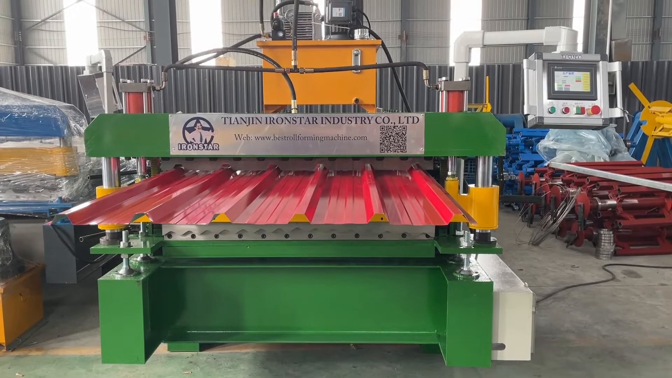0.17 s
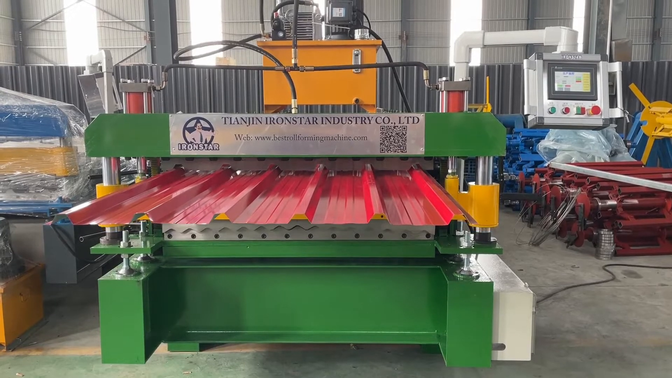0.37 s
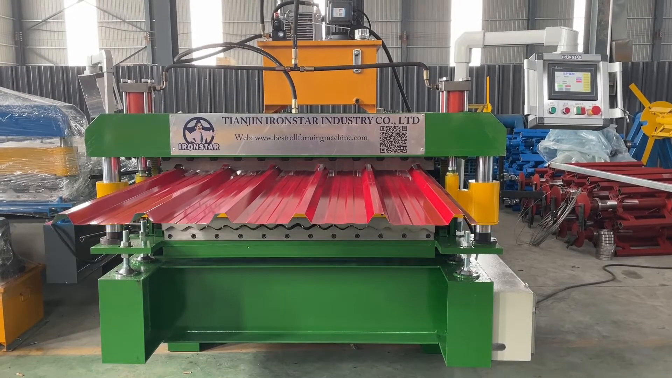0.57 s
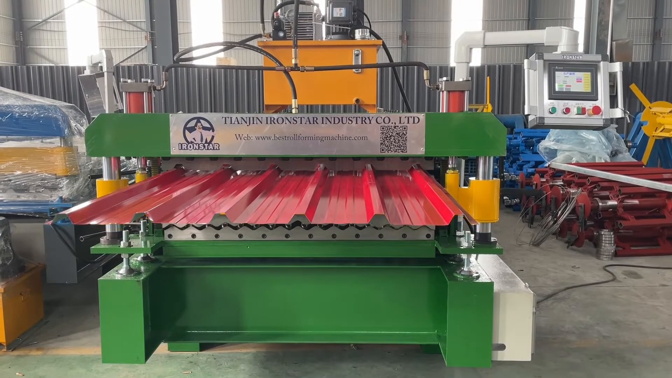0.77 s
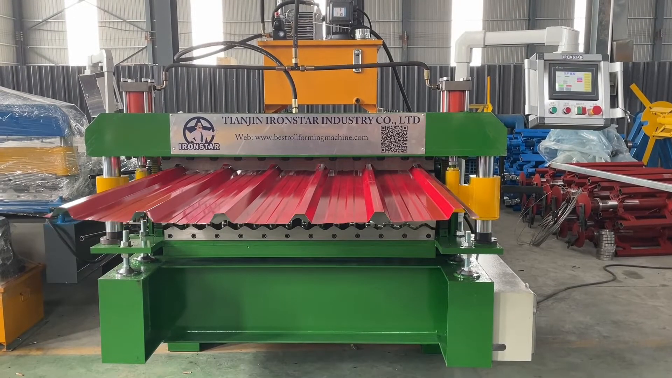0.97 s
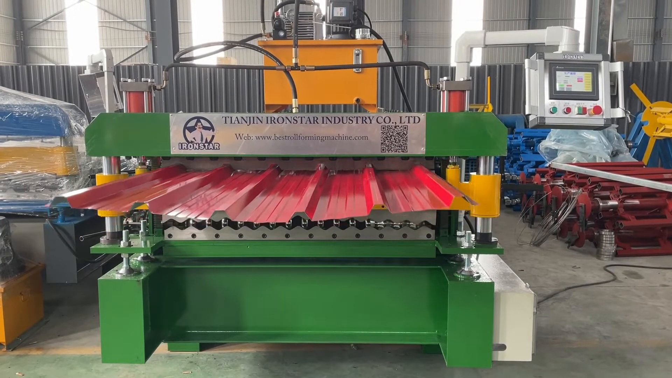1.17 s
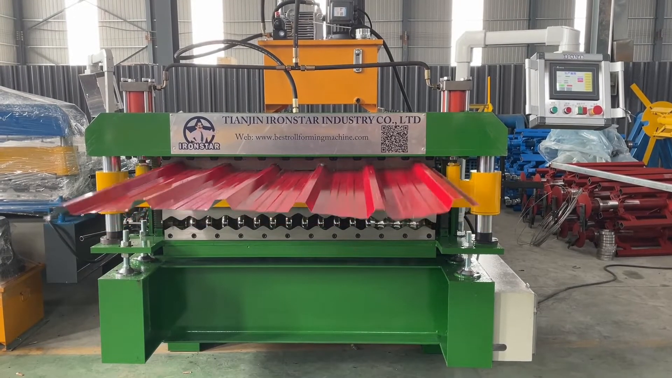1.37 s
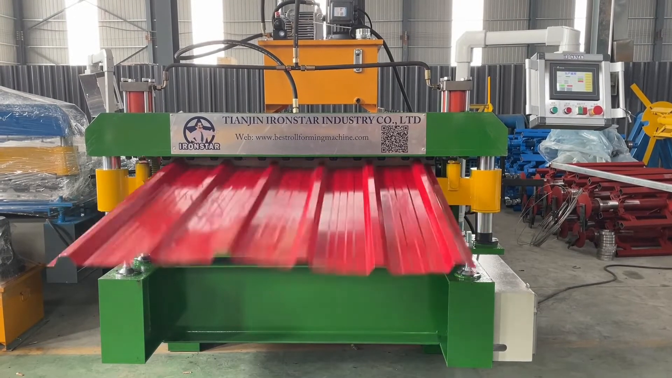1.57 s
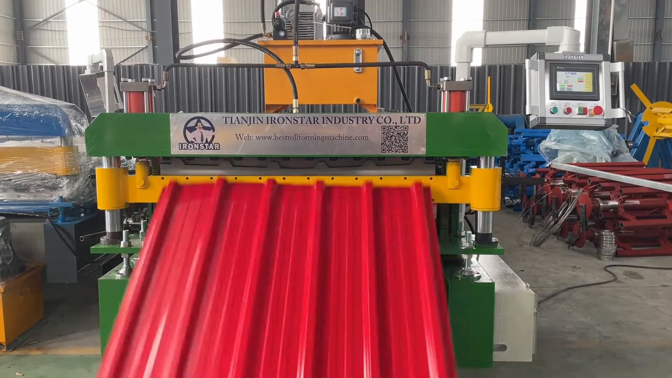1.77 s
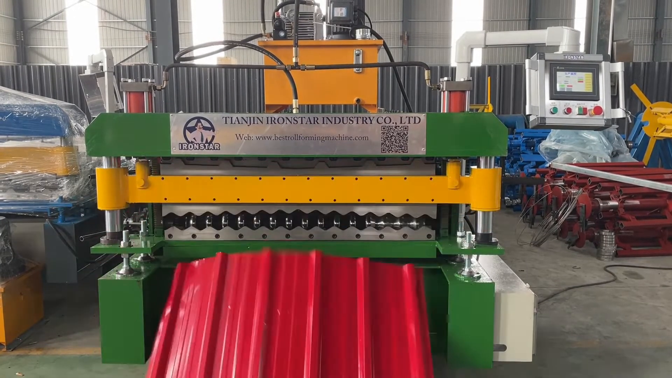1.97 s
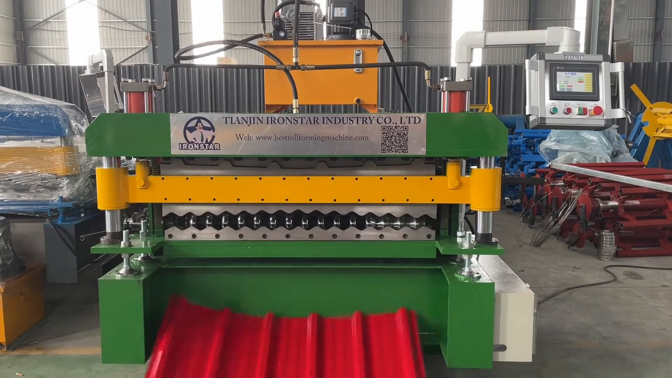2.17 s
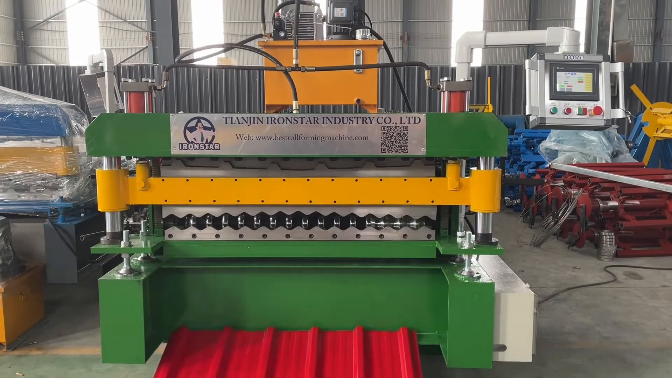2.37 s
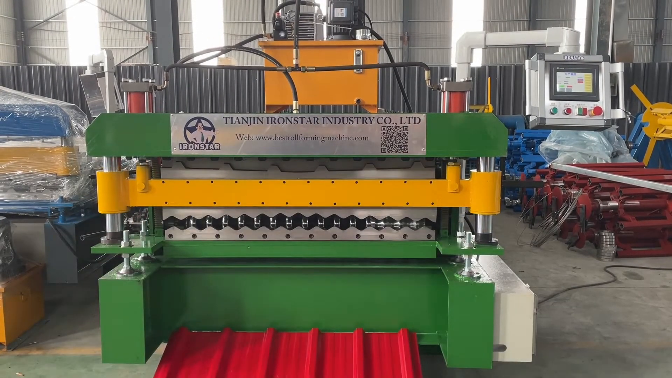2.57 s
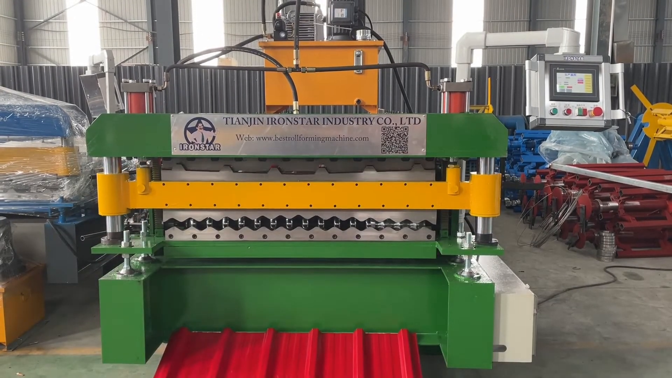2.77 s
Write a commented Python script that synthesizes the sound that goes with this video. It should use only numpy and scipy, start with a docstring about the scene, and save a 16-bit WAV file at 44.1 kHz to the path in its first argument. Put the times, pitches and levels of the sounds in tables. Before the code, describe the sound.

A thin ribbed metal roofing sheet is sheared off, clatters down and rattles on concrete beside a humming machine

```python
"""A roll forming machine hums in a factory hall: shaped noise, faint whines, a low rumble and swelling resonances.
A valve ticks, the tone of the hydraulic pump rises as it takes up load, and the heavy frame thuds.
The shear crunches through a thin ribbed steel panel, which buckles, tips off the die, lands on the concrete
floor and rattles to rest: bursts of clicks ring its modes, and gliding tones sing as the sheet flexes.
The hall rings on after every blow on the panel, as a decaying noise response."""
import sys
import numpy as np
from scipy import signal
from scipy.fft import rfft, irfft
from scipy.io import wavfile
from scipy.ndimage import uniform_filter1d

SR = 44100
rng = np.random.default_rng(int(sys.argv[2]) if len(sys.argv) > 2 else 0)


def digitize_waveform(pressure):
    """Quantize a signal to 16-bit integers and store it at the path in sys.argv[1].

    Rows of a 2-D input are taken as channels; values are limited to [-1, 1].
    """
    field = np.atleast_2d(pressure).T
    bounded = np.clip(field, -1, 1)
    quanta = np.round(bounded * 32767).astype(np.int16)
    wavfile.write(sys.argv[1], SR, quanta)


N = 125685
TIME = np.arange(N) / SR
SIZE = 2 ** 18   # transform length, with room for tails
FREQS = np.maximum(np.arange(SIZE // 2 + 1) * SR / SIZE, 1)


def from_db(db):
    """Decibels to gain."""
    return 10 ** (np.asarray(db) / 20)


def rms_one(x):
    """Scale to unit rms."""
    return x / np.sqrt(np.mean(x ** 2) + 1e-20)


def in_time(rows):
    """Each column of a timed table, drawn as straight lines at every sample."""
    s, *columns = np.transpose(rows)
    return [np.interp(TIME, s, c) for c in columns]


def at_hz(points, hz):
    """Read a table on a log-frequency axis."""
    f, value = np.transpose(points)
    return np.interp(np.log(hz), np.log(f), value)


def drift(rate_hz):
    """Random wander of unit rms, smoothed above the given rate."""
    spectrum = rfft(rng.standard_normal(SIZE))
    return rms_one(irfft(spectrum / (1 + (FREQS / rate_hz) ** 2))[:N])


def coloured(x, db):
    """Minimum-phase filter with the given gain at every frequency, so nothing sounds early."""
    cepstrum = irfft(np.log(from_db(db)))
    cepstrum[1:SIZE // 2] *= 2
    cepstrum[SIZE // 2 + 1:] = 0
    return irfft(rfft(x, SIZE) * np.exp(rfft(cepstrum)))[..., :N]


def octaves(x):
    """Split into overlapping octave bands that add up to the whole: (centre_hz, band)."""
    centres = np.geomspace(50, 12800, num=9)
    spectrum = rfft(x, SIZE)
    for hz, share in zip(centres, np.eye(len(centres))):
        weight = np.interp(np.log(FREQS), np.log(centres), share)
        yield hz, irfft(spectrum * weight)[..., :N]


def bandpassed(x, low_hz, high_hz):
    """Keep one resonant band."""
    return signal.sosfilt(signal.butter(2, [low_hz, high_hz], "band", fs=SR, output="sos"), x)


def stereo_noise(likeness):
    """White noise whose two sides are alike by the given table, mixed from a middle and a side part."""
    mid, side = rfft(rng.standard_normal((2, SIZE)))
    alike = np.clip(at_hz(likeness, FREQS), -.995, .995)
    common = np.sqrt((1 + alike) / 2) * mid
    opposed = np.sqrt((1 - alike) / 2) * side * [[1], [-1]]
    return irfft(common + opposed)[:, :N]


def dense_ring(t60s, likeness):
    """Response of countless modes: noise dying band by band, with unit gain."""
    out = 0
    for hz, band in octaves(stereo_noise(likeness)):
        dying = band * from_db(-60 * TIME / max(at_hz(t60s, hz), .005))
        out = out + dying * np.sqrt(np.mean(band ** 2) / np.mean(dying ** 2) / N)
    return out


def convolved(x, response):
    """Play a sound through a stereo response."""
    return irfft(rfft(x, SIZE) * rfft(response, SIZE))[..., :N]


def burst(s, rise, fall):
    """Straight rise, then exponential fall."""
    rising = np.clip((TIME - s) / max(rise, 1e-4), 0, 1)
    return rising * np.exp(-np.maximum(TIME - s - rise, 0) / max(fall, 1e-3))


def mode(x, hz, t60):
    """One ringing mode, a two-pole resonator; its energy does not depend on its decay."""
    r = np.exp(-np.log(1000) / (t60 * SR))
    w = 2 * np.pi * hz / SR
    return np.sqrt(1 - r) * signal.lfilter([0, np.sin(w)], [1, -2 * r * np.cos(w), r * r], x + 1e-18)


# decay of the hall: hz, t60_s
HALL_T60 = [(60, 2.8), (250, 1.02), (1000, 1.18), (4000, 2), (8000, 0.1), (14000, 0.11)]
# tone of the hall's tail: hz, gain_db
HALL_TONE = [(60, -10.5), (300, -2.5), (1000, -1.5), (4000, -8.5), (12000, -2)]
# left-right likeness of the hall and of the machine noise: hz, correlation
HALL_LIKENESS = [(60, 0.95), (200, 0.93), (600, 0.62), (1300, 0.31), (3000, 0.48), (6000, 0.54), (8200, 1),
                 (12000, 0.66)]


def hall(x):
    """The long tail of the factory hall, a dense decaying response that builds up over 24 ms."""
    tail = dense_ring(HALL_T60, HALL_LIKENESS) * np.clip(TIME / 0.024, 0, 1)
    return coloured(convolved(x.mean(axis=0), tail), at_hz(HALL_TONE, FREQS))


# tone of the motor and rollers, only its shape counts: hz, relative_db (per Hz)
MACHINE_TONE = [(25, -33), (48, -9), (75, -2.5), (125, -4), (170, -4.5), (260, -9), (350, -7.5), (460, -18),
                (600, -12), (780, -20.5), (1000, -18.5), (1500, -25.5), (2200, -25.5), (2800, -27.5),
                (3200, -30), (3900, -29.5), (5300, -34), (6100, -31), (7200, -36.5), (8600, -32.5),
                (9600, -44), (11500, -51), (15500, -51)]
# gain of the two parts of the machine noise: time_s, bass_db, treble_db
MACHINE_LEVEL = [(0, -34.5, -26), (.17, -32.5, -26.5), (.22, -33, -24), (.32, -31.5, -26.5),
                 (.7, -31.5, -27), (1.05, -30, -26.5), (1.3, -30.5, -18.5), (1.9, -32.5, -32),
                 (2.4, -46, -20), (2.85, -55, -34)]
# low rumble: time_s, level_db
RUMBLE_LEVEL = [(0, -38), (.4, -37.5), (.62, -30), (.81, -35), (.87, -59), (1.1, -49), (2.0, -50),
                (2.85, -69)]
# tone of the hydraulic pump: time_s, level_db
PUMP_LEVEL = [(0, -41.5), (.18, -43), (.25, -31), (.44, -29), (.7, -29.5), (1.08, -30.5), (1.3, -28),
              (1.9, -72), (2.4, -46), (2.85, -48)]
# whines of the drive and squeals of the rollers: pitch_hz, level_db, start_s, fading_from_s
WHINES = [(167, -38.5, -.1, 1.35), (568, -47, .3, 1.3), (624, -40, -.1, 0.14), (961, -49, .2, 1.3),
          (2055, -50, -.1, .08), (2885, -54, .3, 1.0), (4335, -49, -.2, 0.24), (5770, -58, .35, 1.2),
          (6080, -58, .4, 1.1), (9950, -63, -.2, .16)]
MACHINE_SPLIT_HZ = 445
RUMBLE_HZ, RUMBLE_WIDTH_HZ = 84.5, 13.4
PUMP_HZ, PUMP_WAVER = 320.4, 0.00027   # waver as a share of the pitch
WHINE_FLUTTER_DB, WHINE_FADE_S = 1.3, 0.086


def machine():
    """Motor and roller noise with faint whines, a narrow-band rumble and the tone of the loaded pump."""
    bass_db, treble_db = in_time(MACHINE_LEVEL)
    noise = rms_one(coloured(stereo_noise(HALL_LIKENESS), at_hz(MACHINE_TONE, FREQS)))
    bass = irfft(rfft(noise, SIZE) / (1 + (FREQS / MACHINE_SPLIT_HZ) ** 4))[:, :N]
    whines = 0
    for hz, db, start, end in WHINES:
        gain = from_db(db + WHINE_FLUTTER_DB * drift(3.9))
        tone = rms_one(np.sin(2 * np.pi * hz * TIME + 0.5 * drift(5.4)))
        fade_in = np.clip((TIME - start) / WHINE_FADE_S, 0, 1)
        fade_out = np.exp(-np.maximum(TIME - end, 0) / WHINE_FADE_S)
        whines = whines + gain * tone * fade_in * fade_out
    half_width = RUMBLE_WIDTH_HZ / 2
    rumble = rms_one(bandpassed(rng.standard_normal(N), RUMBLE_HZ - half_width, RUMBLE_HZ + half_width))
    pump_pitch = PUMP_HZ * (1 + PUMP_WAVER * drift(6.5))
    pump = rms_one(np.sin(2 * np.pi * np.cumsum(pump_pitch) / SR))
    return (from_db(bass_db) * bass + from_db(treble_db) * (noise - bass) + whines
            + from_db(in_time(RUMBLE_LEVEL)[0]) * rumble + from_db(in_time(PUMP_LEVEL)[0]) * pump)


# resonances of the rollers and frame that swell: start_s, rise_s, fall_s, centre_hz, width_hz, level_db
SWELLS = [(-.05, .03, .14, 2200, 380, -41.5), (.17, .05, .06, 2400, 600, -44),
          (.53, .18, .07, 3850, 330, -51.5), (.83, .06, .16, 3880, 450, -50), (-.02, .2, .14, 55, 30, -39)]


def swells():
    """Rubbing, a steady noise, makes single resonances of the machine swell and fade."""
    rubbing = stereo_noise(HALL_LIKENESS)
    out = 0
    for s, rise, fall, hz, width, db in SWELLS:
        resonance = rms_one(bandpassed(rubbing, max(hz - width / 2, 10), hz + width / 2))
        out = out + from_db(db) * burst(s, rise, fall) * resonance
    return out


VALVE_S, VALVE_FALL_S, VALVE_DB, VALVE_ABOVE_HZ = .203, .012, -40, 8000


def valve():
    """A faint, thin tick of high-passed hiss as the pump takes load."""
    high_pass = signal.butter(2, VALVE_ABOVE_HZ, "high", fs=SR, output="sos")
    hiss = signal.sosfilt(high_pass, stereo_noise(HALL_LIKENESS))
    return from_db(VALVE_DB) * burst(VALVE_S, .002, VALVE_FALL_S) * hiss


# heavy thuds of the frame and shear beam: start_s, rise_s, fall_s, pitch_hz, level_db
THUDS = [(.462, 0.012, 0.011, 80, -24.5), (.595, .01, 0.022, 85, -22), (.675, 0.0091, 0.048, 88, -24),
         (.738, 0.022, 0.031, 80, -23.5), (.805, 0.012, 0.011, 80, -22), (1.10, 0.077, 0.1, 47, -28),
         (1.405, 0.053, 0.057, 62, -27.5), (1.964, 0.021, 0.089, 88, -24)]


def thuds():
    """The heavy frame shudders briefly: low tones of wandering pitch."""
    out = 0
    for s, rise, fall, hz, db in THUDS:
        pitch = hz * (1 + 0.148 * drift(16.6))
        tone = rms_one(np.sin(2 * np.pi * np.cumsum(pitch) / SR))
        out = out + from_db(db) * burst(s, rise, fall) * tone
    return out


# the thin sheet snaps through and sings, its pitch sliding as it bends:
# start_s, pitch_hz, glide_hz_per_s, level_db, fall_s (time constant)
POPS = [(1.099, 290, -1500, -15.5, 0.017), (1.128, 139.7, 598, -15.5, 0.015),
        (1.246, 1221, -500, -18.5, 0.02), (1.246, 2002, 500, -23, .015), (1.246, 2540, -1500, -19, 0.014),
        (1.245, 4850, 5000, -30, 0.0088), (1.266, 222.7, 600, -14, 0.035), (1.298, 2990, 800, -23.5, 0.033),
        (1.301, 1399, -300, -28, .025), (1.309, 280, -300, -18, .025), (1.35, 218, -200, -21.5, .04),
        (1.406, 197.2, 300, -17, 0.022), (1.433, 473, 200, -20, 0.036), (1.433, 713, -200, -19, 0.016),
        (1.43, 1092, 202, -17, 0.015), (1.438, 222, -900, -16.5, 0.04), (1.524, 1421, 200, -27.5, .035),
        (1.549, 426, -800, -12, 0.018), (1.554, 143.5, 300, -16, 0.024), (1.582, 338, -300, -9, 0.0093),
        (1.58, 835, -400, -17, 0.016), (1.581, 1087, 900, -15, 0.024), (1.581, 1378, 603, -22, 0.052),
        (1.655, 556.7, -52, -19.5, 0.065), (1.671, 1434, 100, -24, 0.053), (1.713, 2990, -100, -31, 0.022),
        (1.973, 240.2, -42, -11.5, 0.03), (1.973, 4170, -2000, -19.5, 0.023),
        (1.997, 747, -400, -13.5, 0.034), (1.998, 832, -100, -19, 0.032), (2.0, 1865, 2000, -22, .02),
        (2.012, 2990, -1500, -24, 0.015), (2.029, 1066, -200, -20, .028), (2.042, 2960, -500, -22, 0.015),
        (2.139, 811, -100, -20.5, 0.06), (2.146, 1108, 100, -25, 0.021), (2.156, 167.8, 200, -18.5, 0.023),
        (2.165, 252, -54, -16, 0.049), (2.191, 1039, -300, -20, 0.041), (2.226, 1141, 200, -20.5, 0.021),
        (2.228, 4110, 2000, -23.5, 0.033), (2.245, 996, -200, -25, 0.027), (2.272, 2070, 200, -24, .025),
        (2.272, 4330, -300, -27, .025), (2.289, 720, -250, -16, 0.048), (2.292, 1102, -55, -28, 0.069),
        (2.314, 2650, -4000, -23, 0.015), (2.371, 1096, -18, -24, 0.068), (2.679, 1090, 97, -23, 0.0086)]
POP_RISE_S, POP_WAVER = 0.0018, .014   # waver as a share of the starting pitch
POP_BUZZ_DB, POP_BUZZ_HZ = 4.5, 170   # the sheet buzzes against its supports as it rings


def pops():
    """Single gliding, buzzing rings of the flexing sheet."""
    wobble = drift(49.6)
    buzz = rms_one(from_db(POP_BUZZ_DB * np.clip(drift(POP_BUZZ_HZ), -2, 2)))
    turns = rng.random(len(POPS))   # starting phase of each ring, and its place in the wobble and buzz
    out = 0
    for (s, hz, glide, db, fall), turn in zip(POPS, turns):
        shift = int(turn * N)
        slide = glide * np.clip(TIME - s, 0, 2 * fall)   # the glide stops after two time constants
        pitch = hz * (1 + POP_WAVER * np.roll(wobble, shift)) + slide
        rough = np.roll(buzz, shift) ** min(hz / 1000, 1)   # low rings stay smoother
        tone = np.sqrt(2) * np.sin(2 * np.pi * (turn + np.cumsum(pitch) / SR))
        out = out + from_db(db) * burst(s, POP_RISE_S, fall) * rough * tone
    return out


# blows on the panel, each a burst of rattling contacts, levels ahead of the sheet's tone:
# start_s, rise_s, fall_s (time constant), level_db, extra_boom_db, brightness_db_per_octave, dull_above_hz
BLOWS = [(1.078, 0.0055, 0.02, -20, -6, 2.5, 7460), (1.107, 0.012, 0.059, -25, 8, 0.5, 5840),
         (1.167, 0.008, 0.061, -25.5, 10, -1.3, 5000), (1.2464, 0.0016, 0.018, -12.5, -4, 3, 2500),
         (1.272, 0.006, .028, -17.5, 6, 5, 3100), (1.292, 0.0079, 0.036, -20, -4, 3, 13000),
         (1.403, 0.0042, 0.036, -13.5, -3.5, 0.26, 8100), (1.427, 0.0073, 0.045, -24.5, 1.5, 3.5, 18000),
         (1.499, 0.002, 0.058, -17.5, -1.5, -1.5, 12000), (1.543, 0.014, 0.04, -18.5, -11, 0.5, 13400),
         (1.578, 0.0042, 0.064, -16.5, -7.5, 0.5, 12400), (1.655, 0.01, 0.064, -17.5, -5, -3, 8900),
         (1.718, 0.0032, 0.028, -23.5, -7, 0, 3170), (1.859, 0.017, 0.31, -32.5, 7.5, 0, 3000),
         (1.962, 0.0076, 0.029, -15.5, -5.5, 3.5, 7100), (2.003, 0.013, 0.025, -15, -13, 0.5, 5800),
         (2.049, 0.00234, 0.15, -14.5, -14.5, -1, 5340), (2.133, 0.0086, 0.071, -11.5, -7.5, -1, 7960),
         (2.174, 0.0057, 0.021, -17, -12, -1.5, 5970), (2.212, 0.037, 0.06, -15.5, -10.5, 1.04, 7100),
         (2.258, 0.032, 0.036, -29.5, -14, 2.5, 11900), (2.294, 0.0041, 0.005, -21, 0, 1, 7000),
         (2.321, 0.0019, 0.044, -17.5, -11, 1, 7000), (2.37, 0.045, 0.17, -20.5, -20, -0.4, 8800),
         (2.665, 0.021, 0.045, -30, -11, 0, 11800)]
CONTACTS_PER_S, CONTACT_SPREAD_DB = 1500, 4.0
CREST_CONTACT_DB = 12   # one sure click at the crest of each blow, ahead of the blow's own level
BOOM_HZ, BRIGHT_FROM_HZ = 467, 600


def contacts():
    """Blows set the sheet chattering: uneven clicks, boomy or bright. Yields force and energy per octave."""
    spread = CONTACT_SPREAD_DB * np.minimum(rng.exponential(1, N), 3)
    sizes = from_db(spread) * rng.choice([-1, 1], N)
    clicks = sizes * (rng.random(N) < CONTACTS_PER_S / SR)
    # even out the power of the chatter over about 7 ms
    clicks = clicks / np.sqrt(np.abs(uniform_filter1d(clicks ** 2, size=300)) + 0.0012)
    s, rise, _, db, boom_db, bright_db, dull_hz = np.transpose(BLOWS)
    clicks[((s + rise) * SR).astype(int)] = from_db(CREST_CONTACT_DB)
    powers = np.array([burst(*row[:3]) ** 2 for row in BLOWS])
    for hz, band in octaves(clicks):
        boom = boom_db / (1 + (hz / BOOM_HZ) ** 4)
        bright = bright_db * max(np.log2(hz / BRIGHT_FROM_HZ), 0)
        gains = from_db(db + boom + bright)
        envelope = np.sqrt((gains ** 2 / (1 + (hz / dull_hz) ** 4)) @ powers)
        yield band * envelope, (clicks * envelope) ** 2


PING_LOW_HZ, PING_HIGH_HZ, PING_T60_S = 561, 6506, 0.12
PING_DB, PING_SPREAD_DB = -25, 9.5   # level ahead of the sheet's tone


def pings(force, count=40):
    """Higher modes flare up as the contact wanders, so the clatter rings at ever changing pitches."""
    pitches = np.geomspace(PING_LOW_HZ, PING_HIGH_HZ, count) * (1 + 0.0206 * rng.standard_normal(count))
    steps = np.arange(0, 3, .04)   # a new random reach every 40 ms
    reach = from_db(PING_SPREAD_DB * np.clip(rng.standard_normal((count, len(steps))), -2, 2))
    out = 0
    for hz, strength in zip(pitches, reach):
        push = force * np.interp(TIME, steps, rms_one(strength))
        out = out + from_db(PING_DB) * mode(push, hz, PING_T60_S)
    return out


# tone of the whole sheet, raised by SHEET_DB: hz, relative_db
SHEET_TONE = [(30, -32), (60, -18), (100, 6.5), (160, 9), (235, 9.5), (310, 4.5), (450, 2), (620, 2),
              (730, 3), (820, 0), (880, -3), (1090, 1.5), (1200, -2.5), (1460, -3), (1600, -9), (2050, -6),
              (2450, -6), (2950, -8), (3300, -10.5), (4200, -15), (5200, -12), (6500, -14.5), (8000, -21.5),
              (9200, -22), (11000, -31.5), (13000, -23.5), (15500, -31)]
# decay of its dense modes: hz, t60_s
SHEET_T60 = [(60, 0.23), (250, 0.061), (1000, 0.1), (4000, 0.06), (14000, 0.027)]
# its prominent modes, ahead of that tone: pitch_hz, level_before_landing_db, level_after_landing_db, t60_s
MODES = [(164.6, -27, -22, 0.33), (234, -22, -19.5, 0.16), (563, -29, -28, 1), (617, -28.5, -25, 0.55),
         (739, -26, -22, 0.25), (825, -29, -29, 0.23), (982, -32, -26, 0.31), (1087, -27, -19.5, 0.29),
         (1254, -18.5, -25, 0.48), (1413, -21, -30, 0.35), (1458, -23, -26, 0.44), (1883, -43, -22, 0.26),
         (2070, -35, -24, 0.62), (2600, -42, -34, 0.3), (2970, -21, -23, 0.33), (3110, -22, -29, 0.33),
         (3170, -24, -19.5, 0.25), (4210, -40, -17, 0.15), (4320, -29, -14, 0.25)]
# left-right likeness of the sheet's direct sound: hz, correlation
DIRECT_LIKENESS = [(60, 1), (400, 0.99), (1300, 0.56), (4000, 0.41), (8000, 0.81), (12000, 0.44)]
SHEET_DB, LANDING_S = 11, 1.94
SHARED_DB, SHIFTING_DB = -7.5, -0.5   # modes all contacts ring, and those that change with the place


def panel():
    """Contacts ring the sheet's prominent modes and a dense wash, partly different at every place of contact."""
    force, shifting = 0, 0
    for (push, energy), (hz, noise) in zip(contacts(), octaves(stereo_noise(DIRECT_LIKENESS))):
        kept = from_db(-120 / (at_hz(SHEET_T60, hz) * SR))   # energy kept per sample
        stored = signal.lfilter([1 - kept], [1, -kept], energy + 1e-18)
        shifting = shifting + noise * np.sqrt(stored)
        force = force + push
    shared = convolved(force, dense_ring(SHEET_T60, DIRECT_LIKENESS))
    rings = 0
    for hz, held_db, landed_db, t60 in MODES:
        gain = np.where(TIME < LANDING_S, from_db(held_db), from_db(landed_db))
        rings = rings + mode(force * gain, hz, t60)
    ringing = from_db(SHIFTING_DB) * shifting + from_db(SHARED_DB) * shared + rings + pings(force)
    return coloured(ringing, SHEET_DB + at_hz(SHEET_TONE, FREQS))


POP_ROOM_DB = -11.5   # how much of the pops reaches the hall


def scene():
    """Machine, shear and panel in the hall."""
    sheet, rings = panel(), pops()
    background = machine() + swells() + valve() + thuds()
    return background + sheet + rings + hall(sheet + from_db(POP_ROOM_DB) * rings)


# balance of the two sides: hz, left_minus_right_db
BALANCE = [(60, -0.5), (220, -2.5), (600, -0.5), (1300, 0.5), (5000, 1.7), (9000, -0.5)]
# phase between the two sides: hz, left_lag_radians
TREBLE_LAG = [(5000, 0), (6000, .4), (7000, 1.3), (7700, 2.5), (8200, 3.14), (9000, 3.9), (10500, 5.6),
              (12000, 6.6), (13200, 7.7), (15500, 9)]
CUTOFF_HZ = 15800


def record(dry):
    """The two sides differ in level and treble phase; peaks are softly rounded and the top is cut."""
    sides = np.array([[.5], [-.5]])
    ports = from_db(sides * at_hz(BALANCE, FREQS)) * np.exp(-1j * sides * at_hz(TREBLE_LAG, FREQS))
    placed = irfft(rfft(dry, SIZE) * ports)[:, :N]
    rounded = np.tanh(placed / 1.3) * 1.3
    low_pass = np.clip((CUTOFF_HZ - FREQS) / 200 + .5, 0, 1)   # 200 Hz wide slope
    return irfft(rfft(rounded, SIZE) * low_pass)[:, :N]


dry = scene()
out = record(dry)
digitize_waveform(out)
```